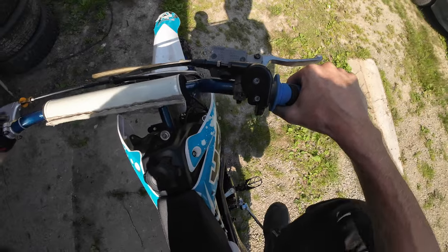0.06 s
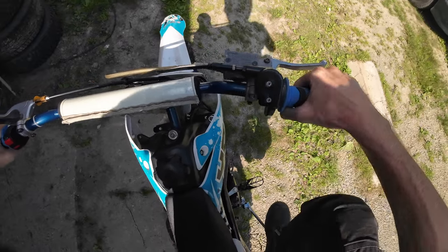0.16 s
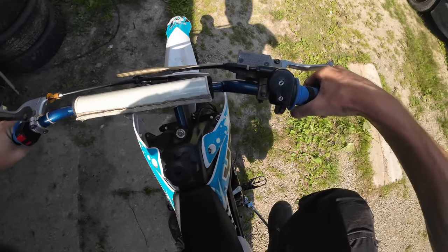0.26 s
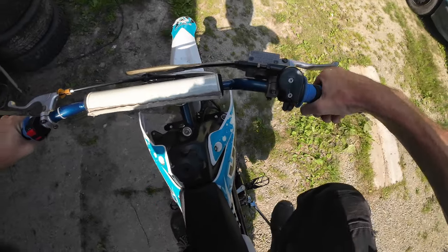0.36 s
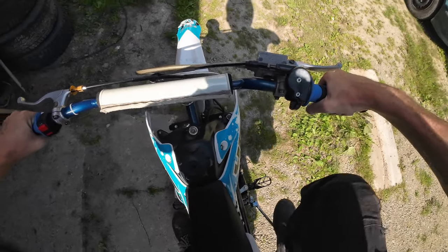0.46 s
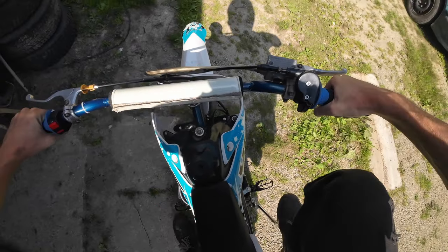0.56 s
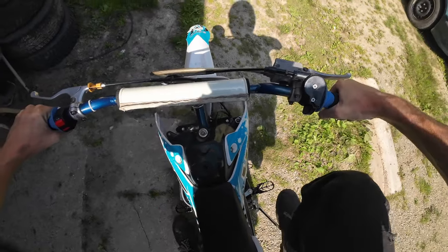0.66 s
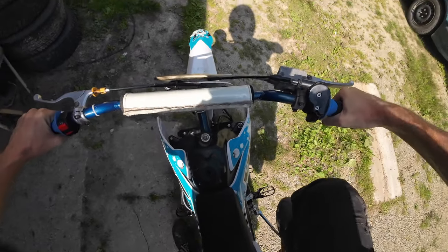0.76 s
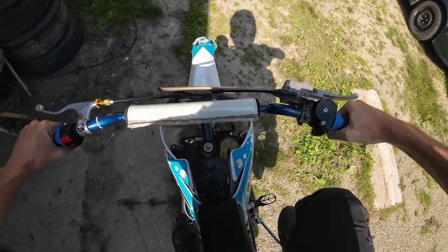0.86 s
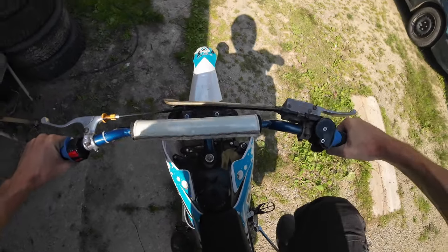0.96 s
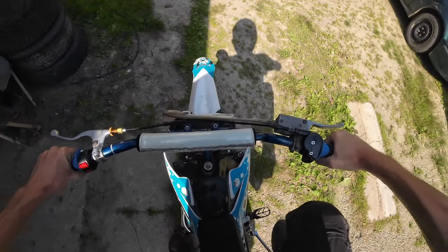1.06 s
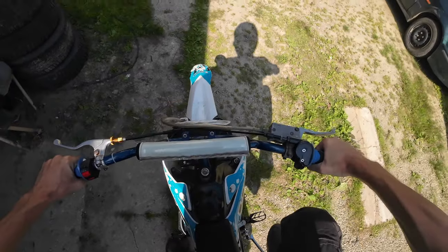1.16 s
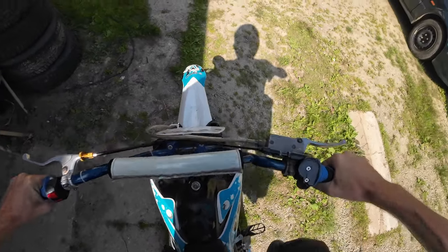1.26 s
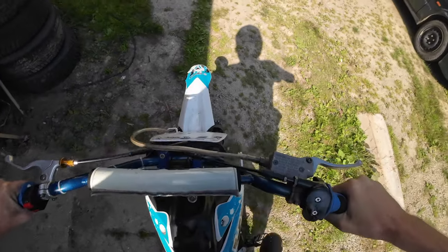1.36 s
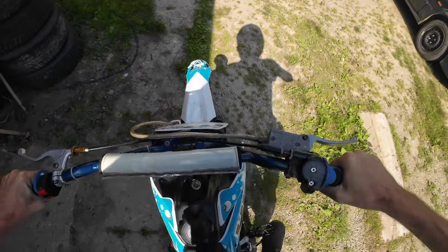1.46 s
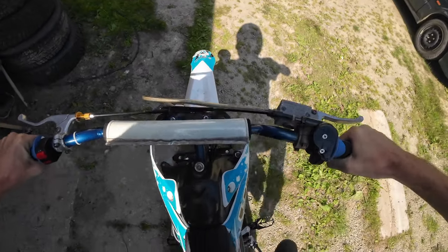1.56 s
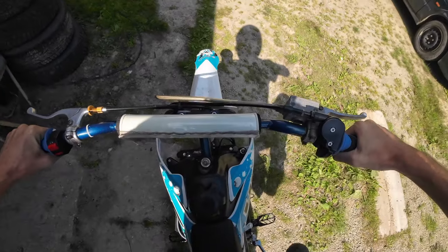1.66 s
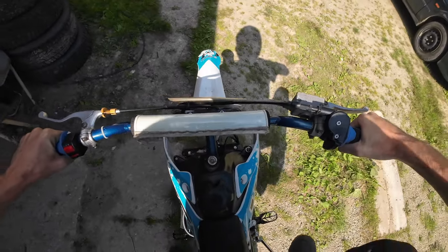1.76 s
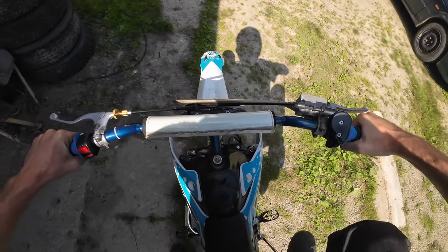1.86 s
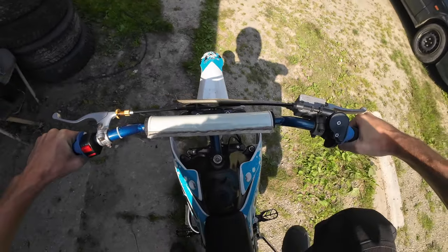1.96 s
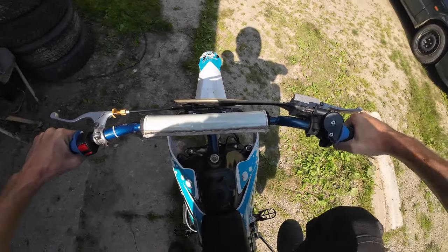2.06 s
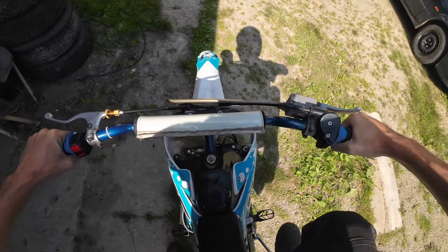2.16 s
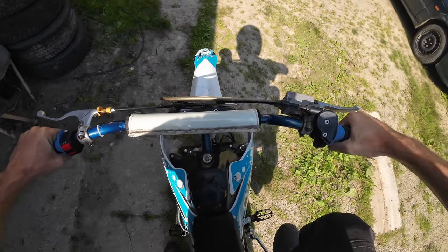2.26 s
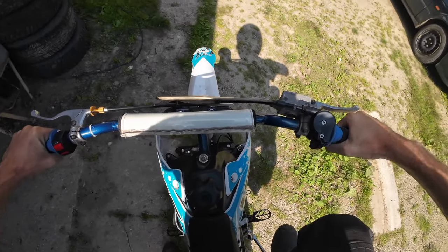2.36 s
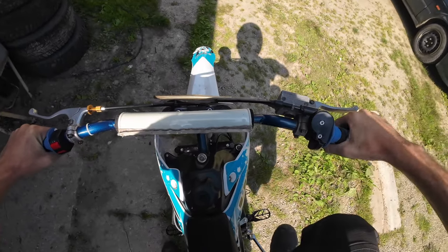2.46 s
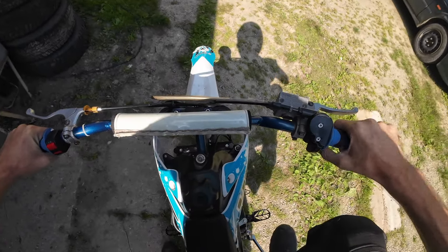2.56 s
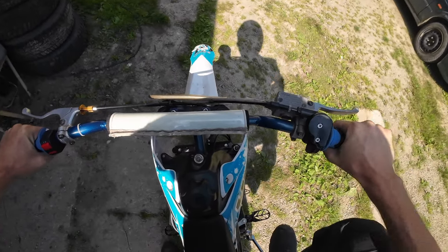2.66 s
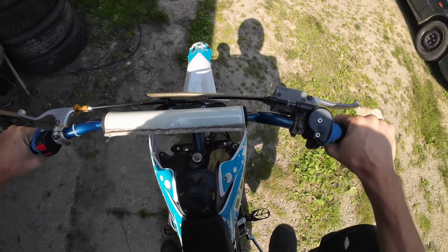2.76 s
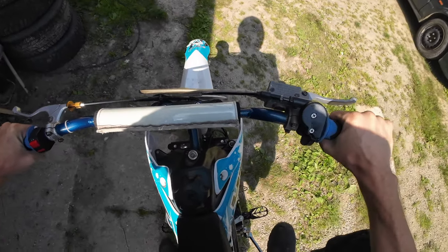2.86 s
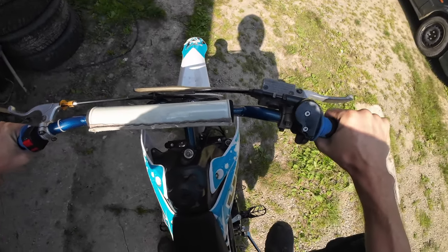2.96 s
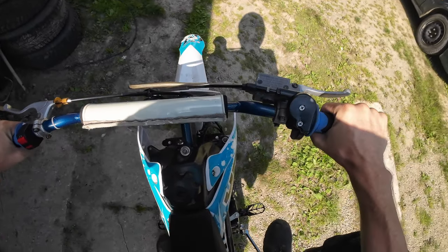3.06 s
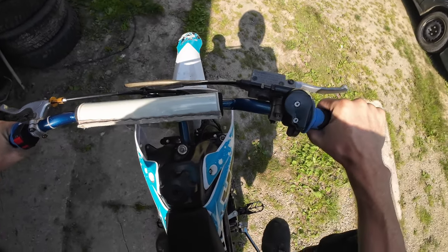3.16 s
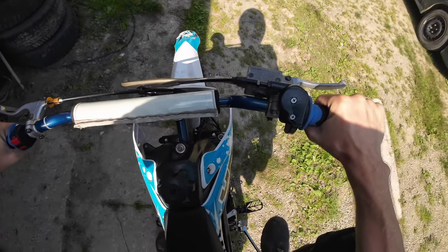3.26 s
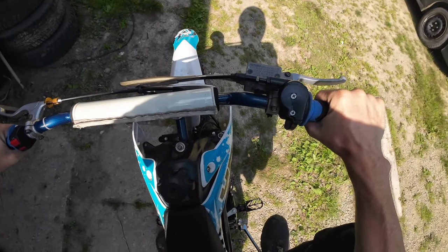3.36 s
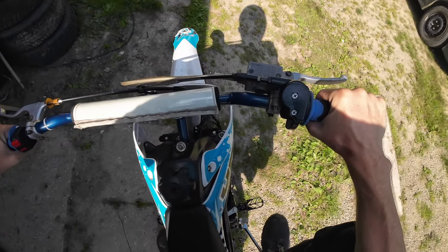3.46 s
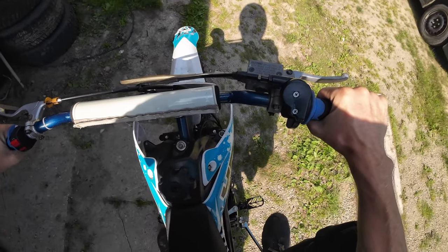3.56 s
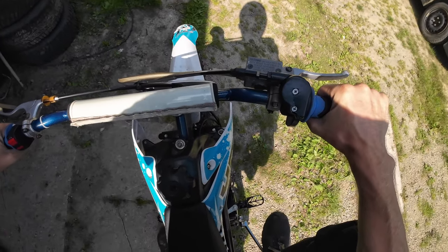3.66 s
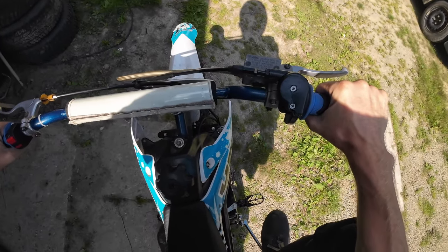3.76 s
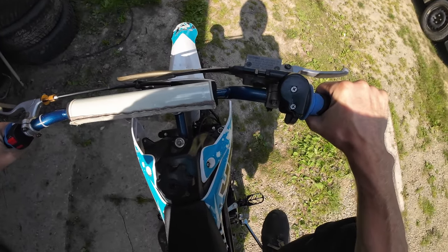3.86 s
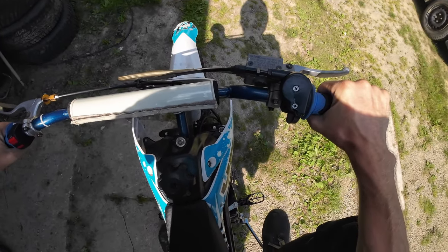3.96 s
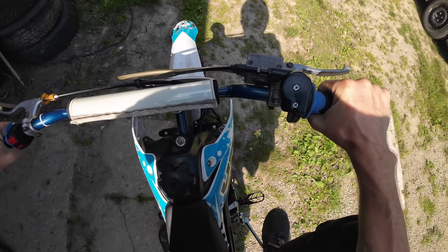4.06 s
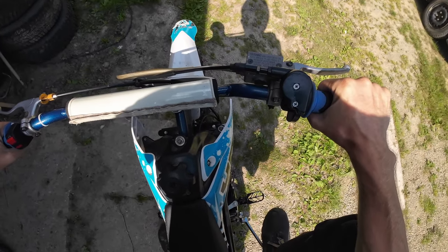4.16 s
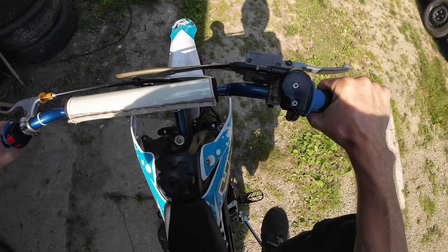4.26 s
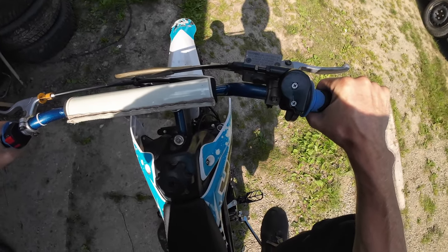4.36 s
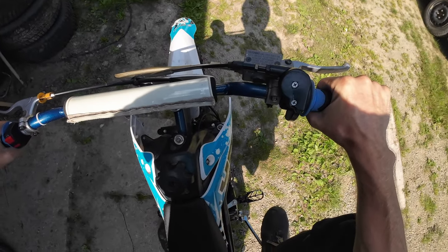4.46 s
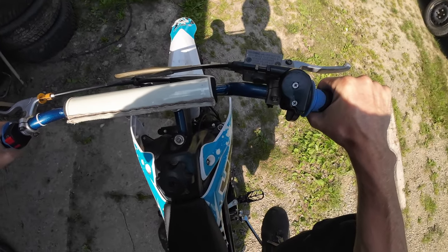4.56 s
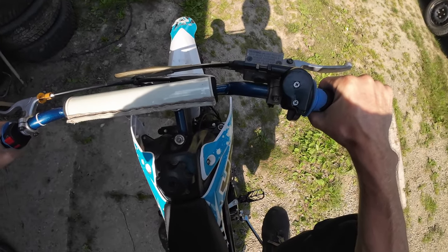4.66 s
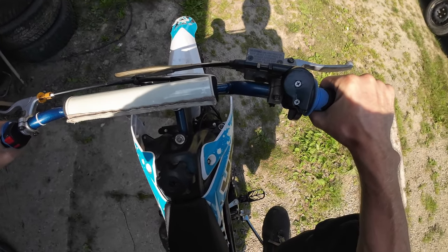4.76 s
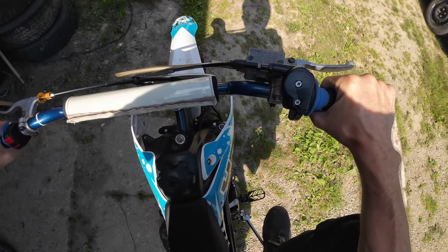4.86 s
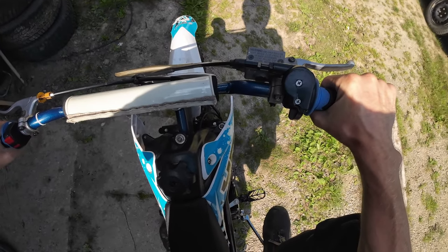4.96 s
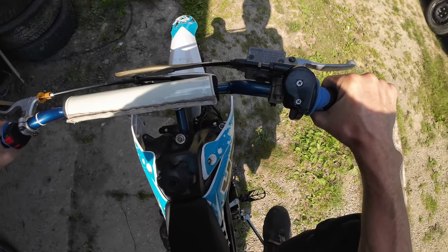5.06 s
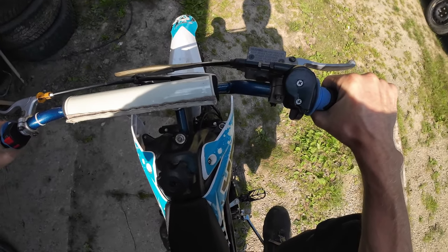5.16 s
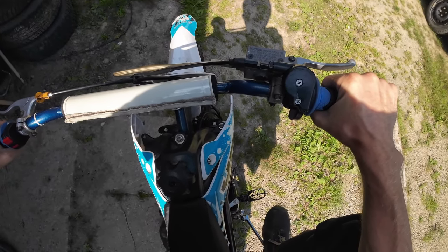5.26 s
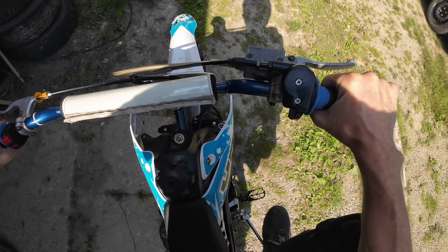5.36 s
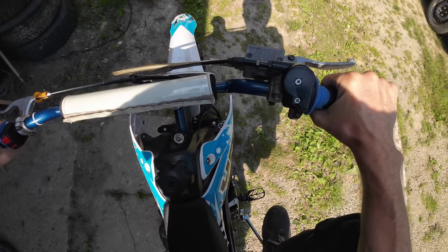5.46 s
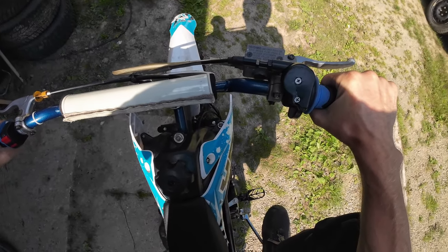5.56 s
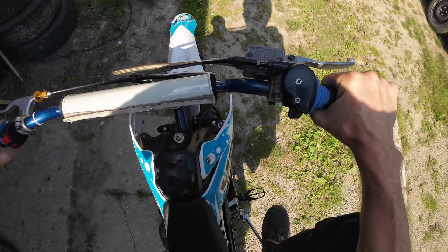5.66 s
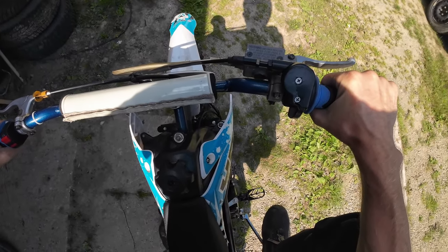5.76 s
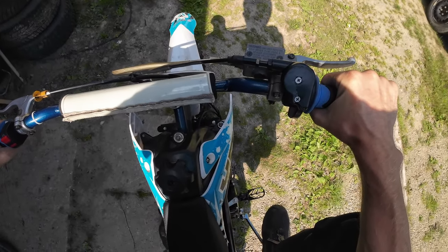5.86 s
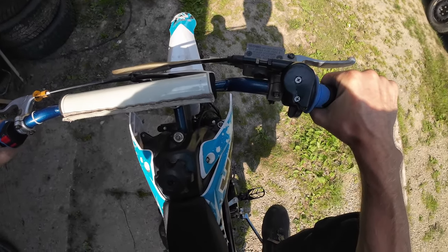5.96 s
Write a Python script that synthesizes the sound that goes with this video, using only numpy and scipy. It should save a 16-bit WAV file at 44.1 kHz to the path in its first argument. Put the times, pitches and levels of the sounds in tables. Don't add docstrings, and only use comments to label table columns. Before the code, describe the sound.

In an open yard, a small motorcycle's kick lever folds out with a faint squeak and a bright clank, followed by a boot tap. A strong kick brings three fast, deep exhaust chugs under a gritty ratchet rattle that slows, then the lever snaps against its stop. The engine never catches. Tiny ticks and cloth rustle fade into distant traffic and low wind thumps on a close stereo microphone.

```python
import sys
import numpy as np
from scipy import signal
from scipy.fft import rfft, irfft
from scipy.io import wavfile

SR = 44100
rng = np.random.default_rng(int(sys.argv[2]) if len(sys.argv) > 2 else 0)


def makeup_ratio(level_db):
    decades = np.asarray(level_db, float) / 20
    return 10 ** decades


def store_pcm(level_fs):
    pcm = np.round(np.clip(level_fs, -1, 1) * 32767).astype(np.int16)
    wavfile.write(sys.argv[1], SR, np.atleast_2d(pcm).T)


N = 264688
T = np.arange(N) / SR


def rms_one(x):
    return x / np.sqrt(np.mean(x ** 2) + 1e-20)


def seconds(length):
    return np.arange(round(length * SR)) / SR


def in_time(rows, outside=None):
    s, *columns = np.transpose(rows)
    return [np.interp(T, s, c, outside, outside) for c in columns]


def at_hz(points, hz):
    table = np.array(points)
    return np.interp(np.log(np.maximum(hz, 1)), np.log(table[:, 0]), table[:, 1])


def shaped(x, spectrum):
    return irfft(rfft(x) * makeup_ratio(at_hz(spectrum, np.fft.rfftfreq(N, 1 / SR))), N)


def band(x, low_hz, high_hz):
    return signal.sosfilt(signal.butter(2, [low_hz, min(high_hz, .45 * SR)], "band", fs=SR, output="sos"), x)


def drift(rate):
    r = np.exp(-80 * np.pi * rate / SR)
    steps = rng.standard_normal(N // 40 + 2002)
    slow = signal.lfilter([1], [1, -2 * r, r * r], steps)[2000:]
    return np.interp(np.arange(N) / 40, np.arange(len(slow)), rms_one(slow))


def hump(s, length):
    return np.exp(-4 * ((T - s) / length) ** 2)


def ring(x, hz, t60):
    r, w = makeup_ratio(-60 / (t60 * SR)), 2 * np.pi * hz / SR
    return signal.lfilter([0, np.sin(w)], [1, -2 * r * np.cos(w), r * r], x + 1e-18)


def add(out, s, sound):
    i = round(s * SR)
    out[..., i:i + sound.shape[-1]] += sound[..., :N - i]


def coloured(spectrum):
    # pitch in Hz, likeness from 0 to 1.
    likeness = [(60, 0.094), (180, 0.88), (550, 0.96), (1650, 0.95), (4970, 0.54), (15000, 0.06)]
    mid, side = rfft(rng.standard_normal((2, N)))
    alike = np.clip(at_hz(likeness, np.fft.rfftfreq(N, 1 / SR)), 0, 1)
    both = np.sqrt(1 + alike) * mid + np.sqrt(1 - alike) * side * [[1], [-1]]
    return rms_one(shaped(irfft(both, N), spectrum))


def crack(low_db, high_db, t60, snap=1.2, rise_s=1e-5):
    t = seconds(.25)
    fade = makeup_ratio(-60 * t / np.clip(t60, .005, .2)) + snap * np.exp(-t / .0008)
    rise = 1 - np.exp(-t / max(rise_s, 1e-5))
    white = rng.standard_normal((3, len(t))) * fade * rise
    lows = makeup_ratio(low_db + 7.5) * band(white[0], 230, 1900)
    mids = band(white[0], 1200, 7000) + .45 * band(white[0], 1200, 3200) + band(.45 * white[1:], 2500, 7000)
    highs = band(band(.7 * white[0] + .7 * white[1:], 7000, 15500), 6000, 17000)
    highs = highs - band(highs, 11000, 17000) * (1 - np.exp(-t / .0067))
    return lows + mids + makeup_ratio(high_db) * makeup_ratio([[1.5], [-1.5]]) * highs


def exhaust():
    # start in seconds, peak in dB, valve open in seconds,
    # level after shutting in dB, overtones in dB.
    chugs = [
        (1.316, -45.5, 0.024, -8, 7.5),
        (1.3914, -12, 0.036, -15.5, -3.5),
        (1.4817, -8.5, 0.022, -3, -6.5),
        (1.5836, -11, .038, -8.5, -9.5),
        (1.692, -48, 0.013, -2, 6.5),
        (1.755, -53.5, 0.014, -11.5, 5.5),
    ]
    # pitch in Hz, level in dB, t60 in seconds, start after valve closing in seconds.
    overtones = [(134.2, 6, 0.077, -.02), (243, -0.5, 0.076, -.012), (325.5, -1.5, 0.085, -.004),
                 (438, -11.5, 0.067, -.012)]
    pipe_hz, sag_hz_per_s, pipe_t60_s = 81.3, 240.0, 0.44
    out, t = np.zeros(N), seconds(.4)
    for s, db, open_s, after_db, over_db in chugs:
        hz = pipe_hz - sag_hz_per_s * open_s
        shut = np.maximum(t - open_s, 0)
        drop_db = after_db * (1 - np.exp(-shut / 0.0029)) - 60 * shut / pipe_t60_s
        shape = np.minimum(t / 0.0018, 1) * makeup_ratio(drop_db - 35 * t)
        creep = 1 + 2.9 * np.minimum(t, .05)
        puff = shape * np.sin(2 * np.pi * hz * t * creep)
        puff += makeup_ratio(-23) * shape * rms_one(band(rng.standard_normal(len(t)), 180, 300))
        for mode_hz, mode_db, t60, lag in overtones:
            mode_hz = mode_hz * (1 + 0.036 * rng.normal())
            mode_db = mode_db + 2.5 * rng.normal()
            late = np.maximum(t - open_s - lag, 0)
            swell = (1 - np.exp(-late / 0.0056)) * makeup_ratio(-60 * late / t60)
            puff += makeup_ratio(over_db + mode_db) * swell * np.sin(2 * np.pi * mode_hz * late)
        add(out, s, makeup_ratio(db) * puff)
        suck = np.exp(-((t - .016) / .0029) ** 2)
        add(out, s - .02, -makeup_ratio(db - 11) * suck)
    return out


def hum():
    start_s, end_s = 1.66, 4.05
    since = np.maximum(T - start_s, 0)
    level = makeup_ratio(-26 - 277 * since) + makeup_ratio(-43.5 - 8.5 * since)
    air = rms_one(band(rng.standard_normal(N), 64.8, 84))
    return level * (T > start_s) * (T < end_s) * makeup_ratio(-3) * air


def starter():
    # start in seconds, peak in dB.
    clicks = [(1.358, -44.5), (1.3802, -42), (1.4151, -37.5), (1.4255, -28), (1.475, -36), (1.4879, -16),
              (1.504, -18.5), (1.5179, -22.5), (1.5268, -15), (1.5383, -23), (1.5479, -20.5),
              (1.563, -17.5), (1.576, -18), (1.5862, -19), (1.602, -23), (1.6181, -19), (1.6348, -18),
              (1.6534, -20), (1.6758, -22), (1.7018, -20.5), (1.724, -20), (1.754, -27)]
    # time in seconds, level in dB.
    turning = [(1.30, -72), (1.342, -59), (1.41, -44), (1.538, -31), (1.604, -39), (1.70, -39), (1.77, -46),
               (1.81, -51), (1.86, -61.5)]
    # pitch in Hz, level in dB per Hz.
    gear_colour = [(400, -33), (700, -7), (1100, 5), (1900, -8), (3000, 0), (5200, 1), (7000, -3),
                   (11000, -0.5), (13000, -4), (16000, -5)]
    teeth = np.zeros((2, N))
    for s, db in clicks:
        high_db = 1.6 - 5 * abs(s - 1.49)
        add(teeth, s - .001, makeup_ratio(db - 8.5) * crack(-15, high_db, .051, snap=1.1, rise_s=.0003))
    shaft = makeup_ratio(-48) * ring(teeth.mean(axis=0) * (T > 1.69), 1362, .5)

    whirr_db, = in_time(turning, outside=-120)
    grit = makeup_ratio(whirr_db + 4.5 * drift(66))
    gears = rms_one(casing(coloured(gear_colour)))
    dull = band(gears, 200.5, 3500)
    treble = makeup_ratio(0.3 * (whirr_db - whirr_db.max()))
    whirr = grit * (dull + treble * (gears - dull))

    load_s, crank_stops_s = 1.43, 1.83
    growl_db = -35.5 - np.maximum(199.5 * (load_s - T), 36.5 * (T - load_s))
    growl = makeup_ratio(growl_db - 1.5 + 3.8 * drift(30)) * rms_one(band(rng.standard_normal(N), 520, 2510))
    growl *= np.clip((crank_stops_s - T) / 0.034, 0, 1)
    return casing(teeth, plain_db=5.0) + whirr + shaft + growl


def casing(x, plain_db=6.0):
    # pitch in Hz, width in Hz, level in dB.
    resonances = [(1870, 200, -1), (3770, 250, -4), (5250, 300, -3), (6270, 120, -6), (7440, 200, -8),
                  (9500, 500, -8), (11000, 400, -8)]
    out = makeup_ratio(plain_db) * x
    for k, (hz, width_hz, db) in enumerate(resonances):
        r = np.exp(-np.pi * width_hz / SR)
        rise, fall = [(1 - r * r) / 2, 0, (r * r - 1) / 2], [1, -2 * r * np.cos(2 * np.pi * hz / SR), r * r]
        out = out + (-1) ** k * makeup_ratio(db) * signal.lfilter(rise, fall, x)
    return out


def notes():
    # start in seconds, peak in dB, pitch in Hz.
    body = [(1.3563, -34, 1510), (1.365, -35, 1280), (1.392, -33, 1900), (1.425, -28.5, 1760),
            (1.4868, -18.5, 1300), (1.5045, -17.5, 1880), (1.5165, -22.5, 1730), (1.5283, -19.5, 1740),
            (1.5383, -19.5, 1870), (1.5474, -24, 1880), (1.5614, -23, 1926), (1.5736, -27, 1960),
            (1.5854, -27, 1000), (1.6177, -19, 2580), (1.6353, -30, 2400), (1.6532, -33.5, 1830),
            (1.6752, -27, 2150), (1.7, -28.5, 1060), (1.723, -32, 1350), (1.752, -39, 1070)]
    bright = [(1.366, -37.5, 5100), (1.416, -30.5, 3970), (1.4265, -25.5, 4760), (1.488, -20, 5850),
              (1.503, -16, 3730), (1.5171, -18, 3950), (1.526, -19, 6200), (1.5364, -19, 6280),
              (1.5479, -19.5, 3980), (1.5615, -14, 5230), (1.5745, -18, 3650), (1.5858, -16.5, 3886),
              (1.6, -23.5, 4640), (1.6162, -24, 3030), (1.6336, -15.5, 5260), (1.6518, -16.5, 4360),
              (1.6737, -22, 3470), (1.6993, -24.5, 5100), (1.723, -21.5, 3510), (1.7511, -28.5, 3000)]
    # start in seconds, peak in dB, pitch in Hz, t60
    # in seconds.
    pings = [(.779, -50, 5000, .06), (0.786, -57, 1660, .05), (0.798, -42.5, 1253, 0.046),
             (.802, -44.5, 815, 0.055), (1.2518, -56.5, 3133, 0.12), (1.2527, -58, 3569, .065),
             (1.2524, -53, 5600, .06), (1.33, -73, 2070, .06), (1.332, -47, 370, 0.063),
             (1.382, -50, 10500, .04), (1.39, -29, 200, 0.055), (1.393, -36, 376, 0.058),
             (1.421, -42, 10100, 0.094), (1.476, -33, 11200, 0.06), (1.494, -32.5, 439.3, 0.044),
             (1.5, -32, 197, .06), (1.619, -28, 202, .07), (1.768, -38.5, 228, 0.051),
             (1.77, -41, 338, .04), (1.811, -53, 330, .04), (1.998, -64, 5400, .03),
             (2.002, -59, 2350, 0.027), (2.13, -54, 800, 0.086), (2.13, -51, 290, 0.075),
             (.638, -45.5, 774, 0.061), (.638, -44, 950, .06), (1.0, -55.5, 355, 0.078),
             (.646, -46, 5170, .03), (.804, -43, 299, 0.061), (.611, -60, 4900, .08),
             (2.198, -57, 1690, .06), (2.7474, -53, 1390, 0.042), (2.7465, -48, 7020, .03),
             (2.746, -67, 5500, 0.032), (2.753, -58, 7550, 0.027), (2.656, -58, 320, .03),
             (1.782, -46, 1700, .04), (1.796, -47, 2200, .04), (1.806, -55, 1720, 0.035),
             (1.279, -35.5, 70, 0.085), (1.377, -23, 110, 0.059), (1.375, -44, 476, 0.049),
             (1.4, -37, 150.7, .06), (4.5, -47, 170, 0.086), (5.019, -48, 900, 0.028),
             (5.844, -54, 900, 0.036)]
    rows = [(s, db - 7.5, hz, .031) for s, db, hz in body]
    rows += [(s, db - 8.5, hz, .035) for s, db, hz in bright]
    out, click = np.zeros((2, N)), seconds(.2) == 0
    for s, db, hz, t60 in [*rows, *pings]:
        pair = ring(click, hz, t60) + .5 * ring(click, hz * 1.025, t60)
        add(out, s, makeup_ratio(db) * pair)
    return out


def lever():
    # start in seconds, peak in dB, lows below 1.9 kHz in dB, crack t60 in seconds, ring
    # in dB.
    contacts = [
        (0.6326, -32.5, -5, 0.0089, -30),
        (0.6335, -29, -10.5, 0.074, -5.5),
        (0.794, -38, -10, 0.057, -40),
        (.803, -55, 12, 0.029, -43),
        (1.2525, -44.5, -8.5, 0.062, -16.5),
        (1.865, -22.5, -18, 0.015, -13),
        (1.866, -24.5, -16.5, 0.051, -3),
        (1.872, -35, -10.5, 0.2, -30.5),
        (2.13, -58.5, 13.5, 0.084, -39),
    ]
    # pitch in Hz, level in dB, t60 in seconds.
    folding = [(1080, -1.5, 0.029), (1390, -1, 0.02), (1900, 1.5, 0.029), (2380, -5.5, 0.11),
               (2976, -29, .2), (3110, -12, 0.074), (3600, -20, 0.17), (4700, 6, 0.02), (5060, -17, 0.14),
               (7360, -19, 0.036), (9950, -5.5, .03)]
    stopped = [(4474, -22.5, 0.15), (1590, -2.5, 0.037), (2398, -11, 0.13), (2600, -24.5, 0.27),
               (6019, -21, .14), (6400, -30.5, 0.15), (3090, -4.5, 0.073), (4695, 3, .04),
               (4800, -29.5, .1), (5500, -24, .15), (5360, 3.5, .04), (5650, -22.5, .15), (6150, -6, 0.057),
               (6800, -23, 0.16), (8400, -22.5, .15), (9740, -14, .09)]
    out, click, before = np.zeros((2, N)), seconds(.5) == 0, 0
    for s, db, low_db, t60, ring_db in contacts:
        high_db = -4.5 if s - before < .02 else 4
        before = s
        add(out, s - .001, makeup_ratio(db) * crack(low_db, high_db, t60))
        for hz, mode_db, mode_t60 in (folding if s < 1.5 else stopped):
            sign = rng.choice([-1, 1])
            add(out, s, sign * makeup_ratio(db + ring_db + mode_db) * ring(click, hz, mode_t60))
    return out


def ticks():
    # start in seconds, peak in dB, colour in Hz, lows in dB, t60 in seconds.
    dry_ticks = [(.787, -61, 1480, 19, 0.12), (.258, -60, 5500, -22, 0.054),
                 (0.354, -67.5, 5000, 18, 0.028), (.47, -67, 5000, -19, 0.08),
                 (0.986, -64.5, 3000, 7.5, 0.22), (1.014, -62, 4940, 5, 0.16), (1.04, -63, 4000, 4, .05),
                 (1.118, -67, 5900, -10, .04), (1.314, -60, 5050, -11, 0.062),
                 (1.998, -62, 5440, -18, 0.02), (2.19, -70, 7650, 11, 0.19), (2.481, -67, 7500, -15, 0.069),
                 (2.512, -66, 5540, -12, 0.042), (2.593, -69, 7100, -13, 0.034),
                 (2.655, -75, 700, 21, 0.033), (2.7465, -47.5, 7620, -6, 0.025)]
    squeaky = [
        (.542, -66, 4270, -15, 0.097),
        (.564, -59.5, 4800, 15, 0.07),
        (0.61, -65, 4300, -11, 0.24),
        (.780, -52, 4650, -6, 0.084),
    ]
    out = np.zeros((2, N))
    for rows, colour_db, high_db in [(dry_ticks, 2, 4), (squeaky, 10, -11)]:
        for s, db, hz, low_db, t60 in rows:
            wide = crack(low_db, high_db, t60)
            add(out, s - .001, makeup_ratio(db) * (wide + makeup_ratio(colour_db) * band(wide, hz / 1.4, hz * 1.18)))
    return out


def sings():
    # start in seconds, peak in dB, pitch in Hz, t60 in seconds, touched at time in seconds.
    rings = [(.6337, -50.5, 2632, .55, .772), (.6337, -41, 3478, .13, .78), (.795, -65, 2632, .4, .9),
             (1.866, -44, 1357, .26, 1.93), (1.868, -39, 3133, .16, 2.1), (1.868, -43, 3246, .16, 2.1),
             (1.868, -48, 4856, .17, 2.1), (1.868, -53, 5335, .2, 2.1), (.564, -54, 4750, .06, .63),
             (.577, -69, 4950, .2, .63), (.543, -67, 4800, .08, .63)]
    out, t = np.zeros((2, N)), seconds(.3)
    for s, db, hz, t60, damped_s in rings:
        damped_db = db - 2000 * np.maximum(t + s - damped_s, 0)
        add(out, s, makeup_ratio(damped_db) * ring(t == 0, hz, t60))
    return out


def echoes(x):
    # delay in seconds, level in dB.
    returns = [
        (.0035, -28),
        (.009, -18),
    ]
    dull, out = band(x.mean(axis=0), 300, 6000), x.copy()
    for lag, db in returns:
        add(out, lag, makeup_ratio(db) * dull)
    yard_t60_s, tail_db = 0.14, -11.5
    t = seconds(.4)
    common, *own = rng.standard_normal((3, len(t)))
    scatter = (common + .6 * np.array(own)) * makeup_ratio(-60 * t / yard_t60_s) * (t > .006)
    scatter *= makeup_ratio(tail_db) / np.sqrt(np.sum(scatter ** 2) / 2)
    return out + signal.fftconvolve(dull[None], scatter, axes=1)[:, :N]


def frame():
    # time in seconds, swing in dB.
    shake = [(1.27, -32), (1.36, -11), (1.40, -30), (1.45, -19), (1.49, -9), (1.66, -15.5), (1.70, -10),
             (1.93, -26), (2.03, -37)]
    shake_hz, crest_s = 19.3, 1.70
    swing = makeup_ratio(in_time(shake, outside=-120)[0]) * np.cos(2 * np.pi * shake_hz * (T - crest_s))
    return swing * [[-.14], [1]]


def cloth():
    # middle in seconds, length in seconds, level in dB.
    rustle = [
        (0.0, 0.2, -65.5),
        (.4, 0.64, -71),
        (0.998, 0.64, -70.5),
        (2.195, 0.88, -73),
        (2.9, 1, -79),
    ]
    rub = sum(makeup_ratio(db) * hump(s, length) for s, length, db in rustle)
    hiss = rub * makeup_ratio(2.2 * drift(50)) * rms_one(band(rng.standard_normal((2, N)), 2300, 11000))
    return hiss - .55 * band(hiss, 5400, 11000)


def far_traffic():
    # pitch in Hz, level in dB per Hz.
    road_colour = [(240, -17.5), (400, -4.5), (432, -8.5), (623, -4), (847, -1), (1540, -8), (2470, -14),
                   (3600, -21.5), (3900, -27.5), (5230, -26.5), (8670, -39.5), (10600, -34.5),
                   (12500, -51.5), (15500, -62.5)]
    rumble_colour = [(29, -28), (50, -10), (80, 0.5), (103, -14.5), (130, -9.5), (260, -20.5), (315, -21),
                     (382, -35.5), (500, -27.5), (650, -55), (1100, -120)]
    # closest time in seconds, dB over steady traffic, seconds to lose 3 dB.
    passes = [
        (2.5, -4, 0.5),
        (3.1, -4.5, -1.5),
        (5.08, 9, 0.23),
        (5.6, -4, 0.56),
    ]
    extra = sum(makeup_ratio(2 * db) / (1 + ((T - s) / width) ** 2) for s, db, width in passes)
    nearer_db = 10 * np.log10(1 + extra)
    road = makeup_ratio(-62 + nearer_db + 0.66 * drift(12)) * coloured(road_colour)
    rumble = makeup_ratio(-65 + 1.32 * nearer_db + 5.5 + 3.5 * drift(4.4)) * coloured(rumble_colour)
    return road + rumble


def far_tones():
    # middle in seconds, length in seconds, level in dB, pitch in Hz, width as a share of pitch.
    tones = [(0.88, 0.47, -63.5, 147.3, 0.075), (3.087, 0.12, -52, 118, 0.019),
             (3.536, 0.1, -54.5, 134, 0.041), (5.46, 1, -55.5, 155, 0.042),
             (3.4, 0.15, -76.5, 12000, 0.031), (3.305, 0.14, -85, 10100, 0.041),
             (5.051, 0.15, -80, 10700, 0.052), (5.23, 1, -58.5, 710, 0.24), (0.3, 0.77, -72, 2380, 0.086),
             (3.06, 0.42, -60, 850, 0.16), (5.615, 0.76, -57.5, 253, 0.32), (5, 0.43, -62, 840, 0.072)]
    air = rng.standard_normal(N)
    return sum(makeup_ratio(db) * hump(s, length) * rms_one(band(air, hz * (1 - width), hz * (1 + width)))
               for s, length, db, hz, width in tones)


def wind():
    # time in seconds, strength in dB, left minus right in dB.
    gusts = [(0.0, -43.5, -16.5), (0.17, -51, -22), (0.33, -64, -14), (0.486, -45, -25), (0.644, -56, -17),
             (1.25, -43.5, -6), (2.05, -52, -16), (2.4, -49, 6), (2.75, -51, -24), (3.05, -53, -9),
             (3.3, -49.5, -5), (3.55, -58, -16.5), (4.06, -52, -7.5), (4.14, -37, -1.5), (5.03, -39.5, 4.5),
             (5.21, -53.5, 2), (5.4, -44, -6), (6.0, -51, 7)]
    # pitch in Hz, level in dB per Hz.
    pressure = [(4, -14), (9, -8), (18, -2.5), (28, -14.5), (60, -47.5), (200, -110)]
    buffet = [(15, -17), (30, 12.5), (50, 7), (80, -13), (130, -20), (250, -40), (700, -110)]
    # time in seconds, peak in dB, sharpness in Hz, way (suck 1, push -1).
    left_slaps = [(4.1782, -22, 90, -1), (4.2071, -23, 75.2, 1), (4.2783, -16.9, 90, 1),
                  (4.3387, -25, 74.5, 1), (4.354, -28, 75.4, -1), (4.4308, -25, 110, -1),
                  (4.498, -23, 90, -1), (4.5963, -28, 165, -1), (4.6431, -15.5, 75, 1),
                  (4.6662, -15.5, 75, 1), (4.6892, -21, 75.5, 1), (4.8025, -23, 75.3, -1),
                  (4.8948, -20.5, 90.5, -1), (4.906, -33, 110.6, -1), (4.929, -22.5, 165, 1),
                  (4.986, -28, 75, 1), (5.001, -20.5, 75.4, -1), (5.1396, -19, 75, -1),
                  (5.1529, -20.5, 90, -1), (5.164, -24, 165, -1), (5.536, -36.8, 199, -1),
                  (5.7562, -29.7, 75, -1), (5.8088, -24.5, 75.2, -1), (5.8804, -30, 75, -1),
                  (5.9076, -27, 75, -1)]
    right_slaps = [(4.297, -22, 110, 1), (4.3703, -19.5, 75, 1), (4.4279, -23, 75, -1),
                   (4.4431, -20.5, 165, 1), (4.4645, -15, 110, -1), (4.4867, -19.5, 75, -1),
                   (4.6192, -17, 90, 1), (4.6356, -21, 75, -1), (4.6852, -22, 200, 1),
                   (4.7916, -25.1, 90, -1), (4.8086, -11.5, 75, -1), (4.8242, -21, 75, 1),
                   (4.87, -27, 75, 1), (4.8926, -25, 75, 1), (4.905, -18.5, 90, -1), (5.0002, -21, 75, 1),
                   (5.0815, -19, 90, 1), (5.102, -18, 75, -1), (5.158, -25, 110, -1), (5.181, -26, 135, 1),
                   (5.3708, -22.5, 75, -1), (5.4603, -32, 135, 1), (5.475, -27, 135, -1),
                   (5.496, -30, 110, 1), (5.8502, -25.5, 75, -1)]
    # time in seconds, peak in dB, port (left 0, right 1), way (push 1, suck -1).
    flicks = [(4.2768, -23, 0, -1), (4.300, -28.5, 1, 1), (4.444, -21, 1, 1), (4.684, -25.5, 1, -1),
              (4.683, -31, 0, -1), (4.900, -22, 0, -1), (5.159, -29, 0, -1), (5.163, -37, 1, -1),
              (5.464, -31, 1, 1), (5.500, -36, 1, 1)]
    gust_db, side_db = in_time(gusts)
    wakes = sum(makeup_ratio(db - 28) * hump(s, .054) for s, db, _, _ in [*left_slaps, *right_slaps])
    buffet_db = 20 * np.log10(makeup_ratio(-58 + 0.83 * (gust_db + 48)) + wakes)
    out = port_noise(pressure, gust_db, side_db, lumpy_db=-1.5)
    out = out + port_noise(buffet, buffet_db, 0.24 * side_db, lumpy_db=5.0)

    t = np.arange(-2000, 4000) / SR
    after = 0.78 * np.exp(-t / 0.0092) * np.cos(2 * np.pi * 25 * t)
    edge = np.where(t < 0, -np.exp(t / 0.0052), after)
    for port, rows in zip(out, (left_slaps, right_slaps)):
        for s, peak_db, sharp_hz, way in rows:
            slap = signal.sosfilt(signal.butter(5, sharp_hz, fs=SR, output="sos"), edge)
            add(port, s - 2000 / SR - .5 / sharp_hz, np.sign(way) * makeup_ratio(peak_db) * slap)
    for s, peak_db, port, way in flicks:
        add(out[int(port > .5)], s - 2000 / SR, np.sign(way) * makeup_ratio(peak_db) * np.exp(-(t / .0017) ** 2))
    return out


def port_noise(spectrum, db, pan_db, lumpy_db):
    noise = shaped(rng.standard_normal((2, N)), spectrum)
    lumps = makeup_ratio(lumpy_db * np.array([drift(14), drift(9.3)]))
    return makeup_ratio(db + 5.5 + np.array([pan_db, -pan_db]) / 2) * rms_one(noise * lumps)


def scene():
    metal = echoes(starter() + notes() + lever() + ticks())
    bike = exhaust() + hum() + metal + sings()
    return bike + frame() + cloth() + far_traffic() + far_tones() + wind()


def low_pass(x):
    return signal.sosfilt(signal.butter(12, 16810, fs=SR, output="sos"), x)


def record(dry):
    # pitch in Hz, level in dB.
    response = [(10000, -0.5), (11700, -2.5), (12900, -22), (14500, -12.5), (15700, -13.5), (16100, -62)]
    heard = shaped(dry, response)
    white = rng.standard_normal(dry.shape)
    hiss = makeup_ratio(-95.5) * rms_one(band(white, 10000, 15800))
    top_hiss = makeup_ratio(-99) * rms_one(band(white, 14500, 15800))
    return low_pass(heard + hiss + top_hiss)


dry = scene()
out = record(dry)
store_pcm(out)
```